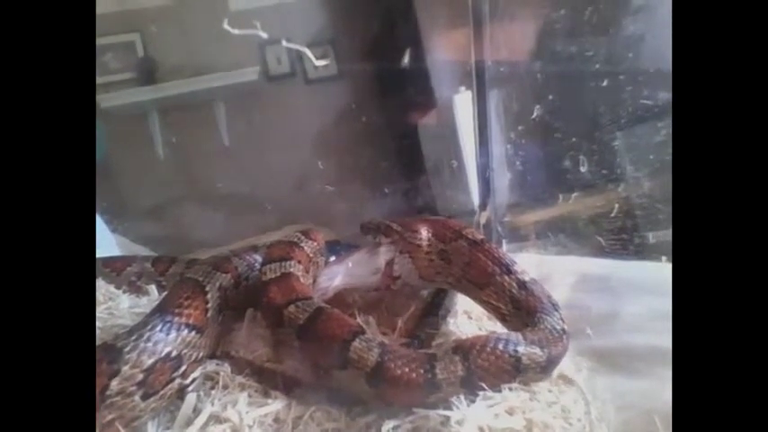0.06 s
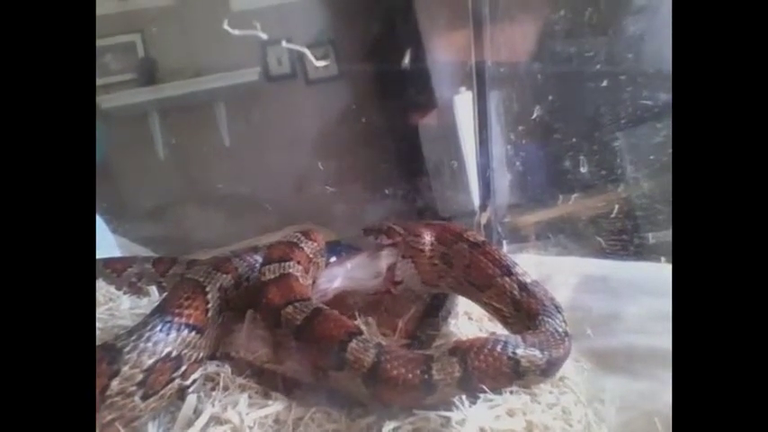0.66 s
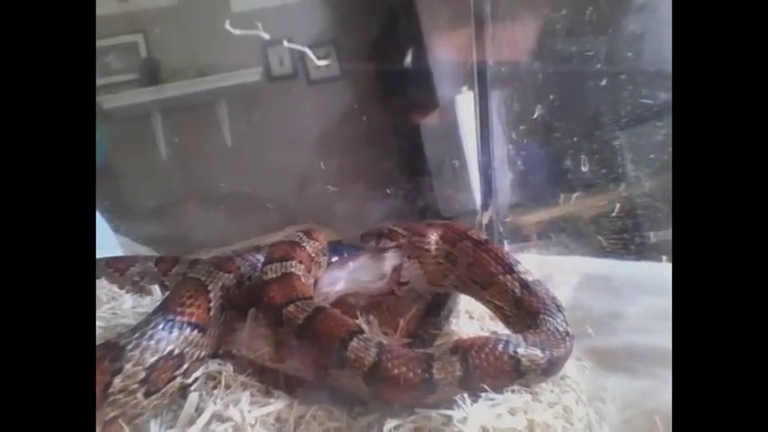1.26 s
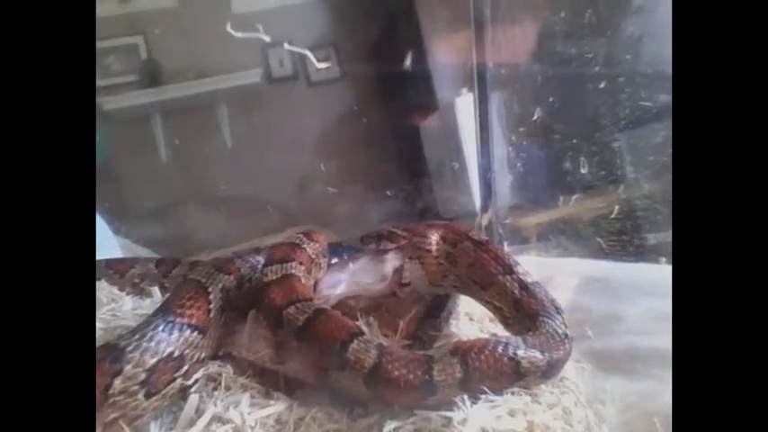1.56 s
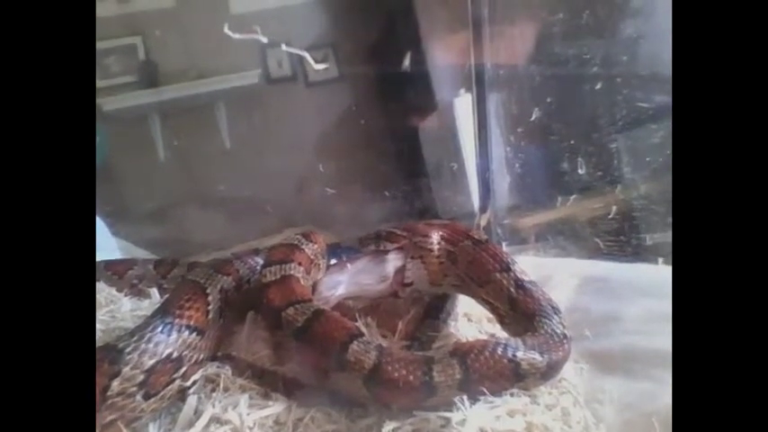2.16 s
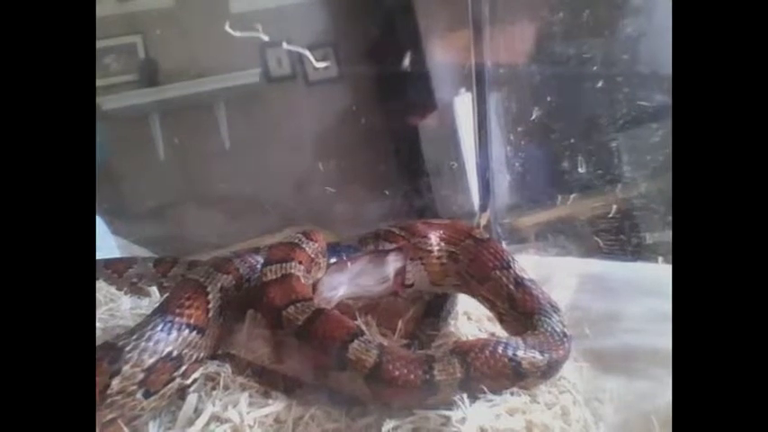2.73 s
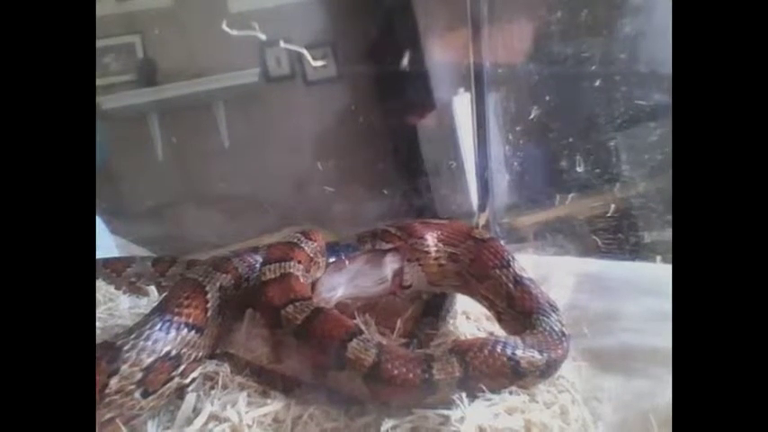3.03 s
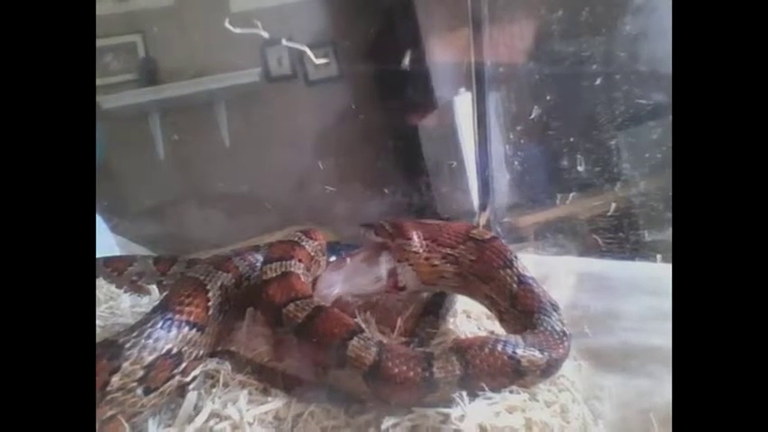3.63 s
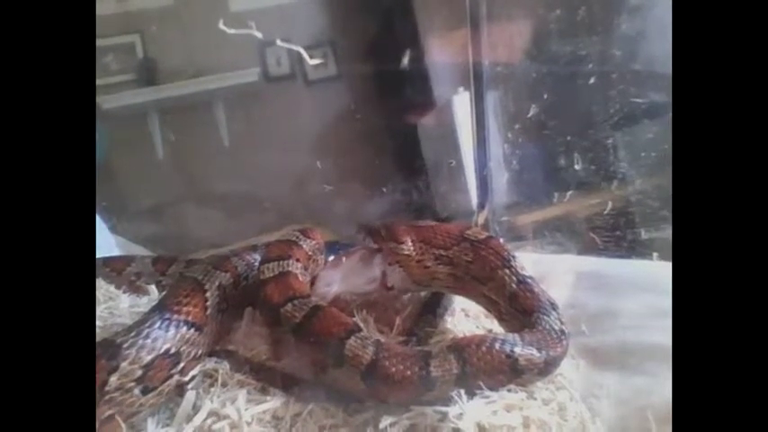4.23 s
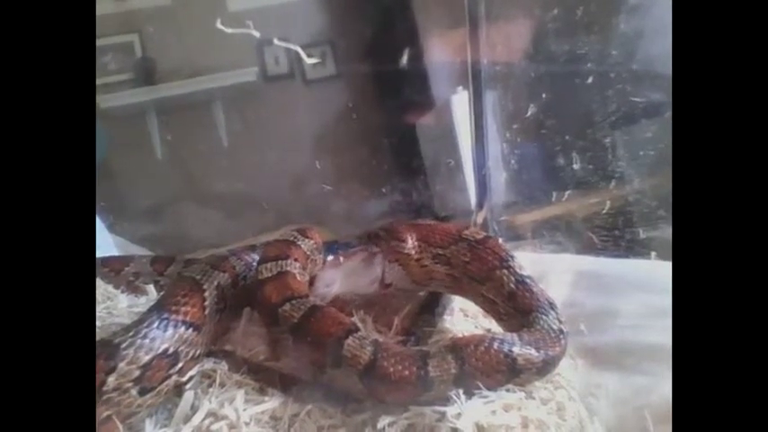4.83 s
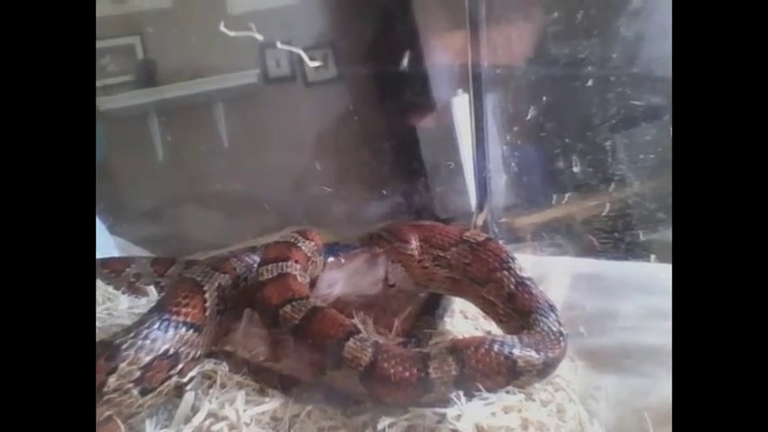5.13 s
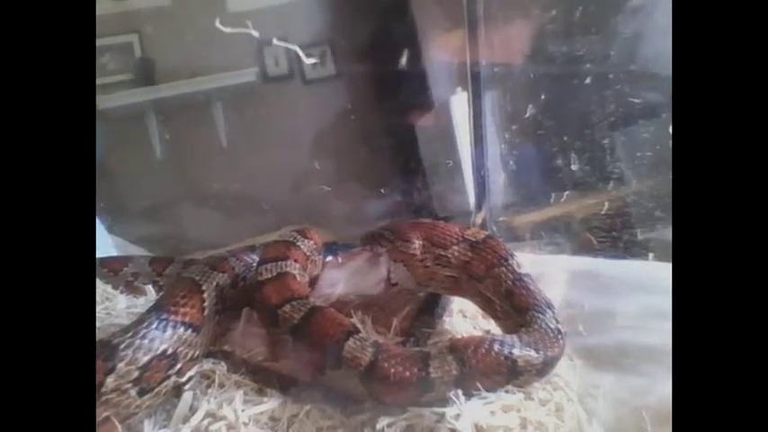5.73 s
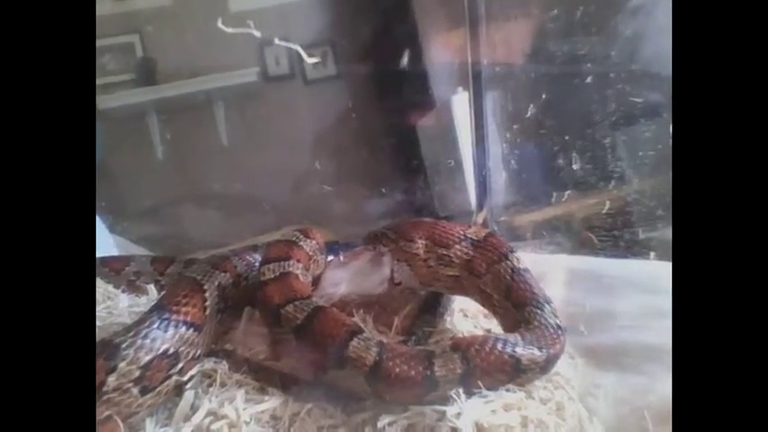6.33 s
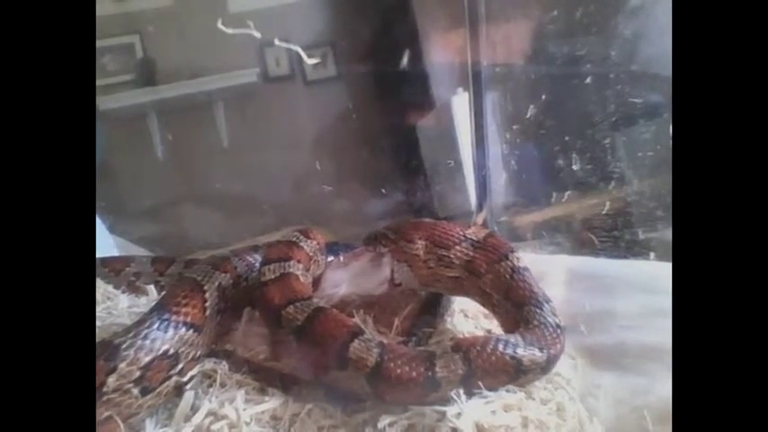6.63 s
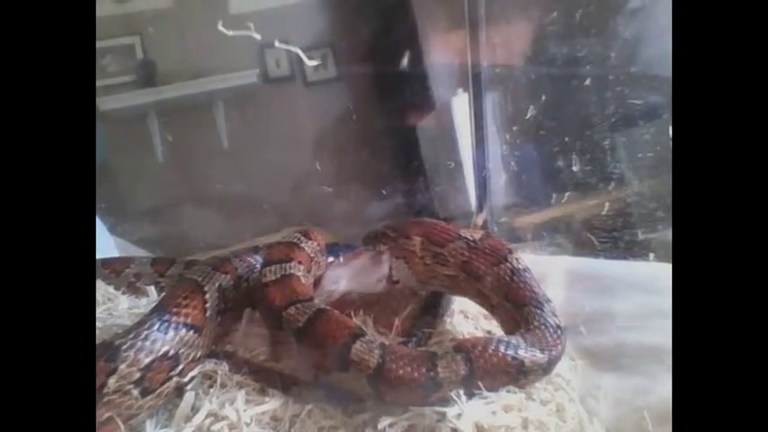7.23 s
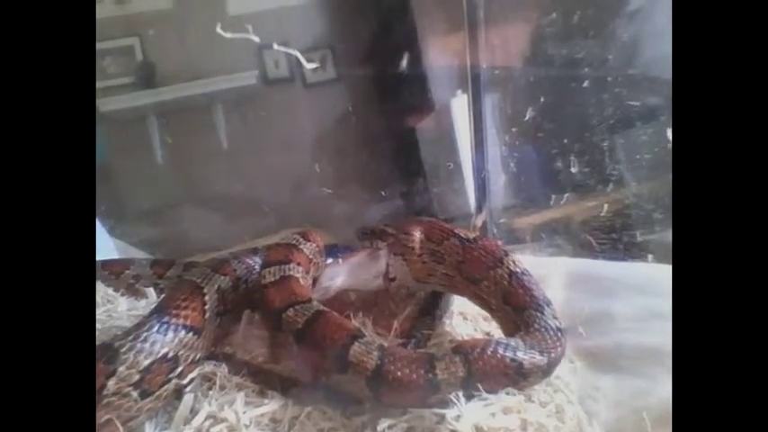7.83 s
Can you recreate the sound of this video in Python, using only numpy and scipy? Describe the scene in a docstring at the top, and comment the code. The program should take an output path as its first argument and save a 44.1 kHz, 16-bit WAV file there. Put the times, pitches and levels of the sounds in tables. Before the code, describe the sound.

A faint, muffled engine fades outside a quiet, hissing room, and a small plastic switch clicks once close by.

```python
"""Quiet room with a glass terrarium. Outside, an eight-cylinder engine eases off and fades; only
low orders and rumble pass the walls. The room booms once as the firing tone sinks through a mode.
Close by, a small plastic switch clicks down and up, a soft bump between the two ticks.
Faint handling rustles and bursts of electronic whine; steady room and microphone hiss throughout."""
import sys
import numpy as np
from scipy import signal
from scipy.fft import rfft, irfft
from scipy.io import wavfile
from scipy.ndimage import uniform_filter1d

SR = 44100
rng = np.random.default_rng(int(sys.argv[2]) if len(sys.argv) > 2 else 0)


def unload_audio(sound):
    """Save the sound as a 16-bit wav file, at the path given as the first command line argument."""
    columns = np.transpose(np.atleast_2d(sound))
    # keep every value between -1 and 1, then stretch to whole-number steps
    steps = np.round(np.clip(columns, -1, 1) * 32767)
    wavfile.write(sys.argv[1], SR, steps.astype(np.int16))


N = 356328
TIME_S = np.arange(N) / SR

# engine cycle rate, eight firings a cycle: t/s, f/Hz
CYCLE_RATE = [(0, 21.5), (0.9, 21.5), (1.3, 20.53), (1.6, 19.6), (2.05, 18.33), (2.8, 18.74), (3.15, 18.67),
              (4.1, 17.7), (4.8, 17.11), (5.7, 17.02), (6.15, 18.3), (6.8, 18.04), (7.3, 16.54),
              (8.08, 15.3)]
# engine indoors, before boom, surges and highpass: t/s, firing level/dB, burble level/dB
ENGINE_LEVELS = [(0, -65, -57), (.78, -62, -51), (.97, -52, -52.5), (1.2, -53.5, -50), (1.52, -52.5, -52.5),
                 (1.68, -59, -57), (2.05, -58, -57.5), (2.3, -57.5, -52.5), (2.92, -55.5, -49.5),
                 (3.2, -56, -59.5), (3.85, -61.5, -57), (4.08, -56.5, -60.5), (4.9, -61.5, -59),
                 (5.6, -60, -59.5), (6.05, -59, -68), (6.5, -72.5, -68), (6.9, -61.5, -70),
                 (7.3, -74, -68.5)]
# exhaust orders: multiple of the cycle rate, level/dB re burble
EXHAUST_ORDERS = [(3, -4), (4, -17), (5, 0), (7, -14), (9, -17), (11, -15)]
# firing tone surges: t/s, boost/dB
FIRING_SURGES = [(1.35, 1.5), (2.33, 8), (2.45, 4.5), (2.61, 4), (2.73, 10), (2.89, 4), (3.72, 7),
                 (5.86, 4)]
# tyre and exhaust rumble: t/s, level/dB
RUMBLE_LEVELS = [(0, -60.5), (0.7, -59), (1.6, -52.5), (2.8, -61), (4.2, -65), (5.0, -63), (6.0, -66.5),
                 (8.08, -67)]
# rumble spectrum: f/Hz, relative density/dB
RUMBLE_SPECTRUM = [(10, -8), (25, -3.5), (60, 1.5), (100, -1), (160, -4), (230, -12.5), (320, -24),
                   (600, -35.5), (1500, -74)]
# switch ticks: t/s, peak level without tail/dB, t60 factor
SWITCH_TICKS = [(4.3169, -34, 1.06), (4.3340, -38, 1.2)]
# switch modes, before bandpass: f/Hz, relative level/dB, base t60/s
PLASTIC_MODES = [(3700, -12, 0.0089), (4860, -18, 0.0059), (5250, 0, 0.01), (5770, 1, .005),
                 (6630, -6, 0.0081), (9150, -6.5, 0.0046), (10050, -11, .005), (10670, -13, 0.0084)]
# handling rustles: t/s, level/dB, 1/e half width/s
RUSTLE_SWELLS = [(3.99, -59.5, 0.049), (4.582, -63.5, 0.16), (6.661, -63.5, 0.029), (6.82, -66, 0.096)]
# rustle spectrum: f/Hz, relative density/dB
RUSTLE_SPECTRUM = [(80, -20), (180, 3), (400, 5.5), (800, -1.5), (1600, -19), (5000, -25), (12000, -47)]
# electronic whine: f/Hz, rms level/dB
WHINE_TONES = [(7000, -94), (9000, -98)]
# whine onsets: t/s
WHINE_ONSETS_S = [.52, 2.38, 4.27, 6.5, 7.98]
# room air and microphone hiss: f/Hz, relative density/dB
HISS_SPECTRUM = [(10, -13.5), (30, -1.5), (130, -1), (300, -5), (600, -9), (1200, -14), (3500, -19.5),
                 (5200, -24.5), (6400, -31), (7900, -40.5), (10500, -36.5), (12500, -39), (14000, -49),
                 (15000, -57)]

BOOM_HZ, BOOM_HALF_WIDTH_HZ, BOOM_DB = 161.6, 4.85, 15.5
SURGE_HALF_WIDTH_S = 0.031
BUMP_AT_S, BUMP_HZ, BUMP_HALF_WIDTH_S, BUMP_ENVELOPE_DB = 4.3299, 370, 0.0023, -36
WHINE_BURST_S = 0.49
HISS_DB = -61
LOWPASS_HZ = 15000


def engine():
    """Eight firings a cycle give the main tone; uneven exhaust banks add burble on other orders."""
    cycle_hz, = curves(CYCLE_RATE)
    firing_db, burble_db = curves(ENGINE_LEVELS)
    cycle_rad = 2 * np.pi * np.cumsum(cycle_hz) / SR
    firing = room_boom(8 * cycle_hz) * engine_order(8 * cycle_rad, flutter_db=2.5, sway_rad=0.22)
    burble = sum(undb(db) * engine_order(order * cycle_rad, flutter_db=2.5, sway_rad=0.25)
                 for order, db in EXHAUST_ORDERS)
    drone = undb(firing_db + surges_db()) * firing + undb(burble_db) * burble
    # the room carries little of the deepest order
    return signal.sosfilt(signal.butter(6, 63, "highpass", fs=SR, output="sos"), drone)


def engine_order(phase_rad, flutter_db, sway_rad):
    """One engine harmonic; uneven firings shake its phase and level."""
    angle_rad = phase_rad + rng.uniform(0, 2 * np.pi) + sway_rad * wander(rate_hz=14)
    return np.sqrt(2) * np.sin(angle_rad) * undb(flutter_db * wander(rate_hz=21.99))


def room_boom(hz):
    """Gain of one room mode for a tone at hz."""
    return 1 + (undb(BOOM_DB) - 1) / (1 + ((hz - BOOM_HZ) / BOOM_HALF_WIDTH_HZ) ** 2)


def surges_db():
    """Short throbs of the firing tone, all of one width."""
    return sum(db * gaussian(at_s, SURGE_HALF_WIDTH_S) for at_s, db in FIRING_SURGES)


def rumble():
    """Tyre and exhaust noise; the walls stop the treble."""
    level_db, = curves(RUMBLE_LEVELS)
    return undb(level_db) * noise(RUMBLE_SPECTRUM)


def switch():
    """Two sharp ticks; between them the casing swings once as the switch bottoms out."""
    swing = -np.sin(2 * np.pi * BUMP_HZ * (TIME_S - BUMP_AT_S))
    sound = undb(BUMP_ENVELOPE_DB) * swing * gaussian(BUMP_AT_S, BUMP_HALF_WIDTH_S)
    for at_s, db, t60_factor in SWITCH_TICKS:
        snap = undb(db) * tick(t60_factor, tail_db=-10, tail_t60_s=0.08)
        start = int(at_s * SR)
        sound[start:start + len(snap)] += snap
    return sound


def tick(t60_factor, tail_db, tail_t60_s):
    """A snap rings the plastic for milliseconds; nearby surfaces scatter a faint tail."""
    t = np.arange(SR // 8) / SR
    ring = sum(undb(db - 60 * t / (t60_s * t60_factor)) * np.cos(2 * np.pi * hz * t)
               for hz, db, t60_s in PLASTIC_MODES)
    # a small part radiates little bass; the contact softens the top
    ring = signal.sosfilt(signal.butter(5, [3300, 11200], "bandpass", fs=SR, output="sos"), ring)
    scatter = rng.standard_normal(len(t)) * undb(-60 * t / tail_t60_s)
    tail = signal.fftconvolve(ring, scatter / np.linalg.norm(scatter))[:len(t)]
    return (ring + undb(tail_db) * tail) / np.abs(ring).max()


def rustles():
    """Dull swells of rubbing, near the hiss level."""
    swells = sum(undb(db) * gaussian(at_s, half_width_s) for at_s, db, half_width_s in RUSTLE_SWELLS)
    return swells * noise(RUSTLE_SPECTRUM)


def whine():
    """Electronics sing faintly, about every two seconds."""
    gate = sum(1.0 * ((TIME_S > at_s) & (TIME_S < at_s + WHINE_BURST_S)) for at_s in WHINE_ONSETS_S)
    tones = sum(undb(db) * np.sqrt(2) * np.sin(2 * np.pi * hz * TIME_S + wander(rate_hz=160))
                for hz, db in WHINE_TONES)
    return uniform_filter1d(gate, size=1000) * tones


def hiss():
    """Steady noise of room air and microphone."""
    return undb(HISS_DB) * noise(HISS_SPECTRUM, unit_rms_above_hz=280)


def undb(db):
    """dB to gain."""
    return 10 ** (np.asarray(db) / 20)


def gaussian(at_s, half_width_s):
    """Bell envelope, peak 1."""
    return np.exp(-((TIME_S - at_s) / half_width_s) ** 2)


def curves(table):
    """Columns after t/s, linearly interpolated per sample."""
    times_s, *columns = np.transpose(table)
    return [np.interp(TIME_S, times_s, column) for column in columns]


def noise(shape, unit_rms_above_hz=0):
    """Noise shaped by a table of f/Hz, density/dB."""
    hz, db = np.transpose(shape)
    bins_hz = np.arange(N // 2 + 1) * SR / N
    gain = undb(np.interp(np.log(bins_hz + 1e-3), np.log(hz), db))
    spectrum = rfft(rng.standard_normal(N)) * gain
    return irfft(spectrum, N) / np.std(irfft(spectrum * (bins_hz >= unit_rms_above_hz), N))


def wander(rate_hz):
    """Random steps, smoothed twice; rms 1."""
    hold = int(SR / rate_hz)
    steps = np.repeat(rng.standard_normal(N // hold + 1), hold)
    smooth = uniform_filter1d(uniform_filter1d(steps, hold), hold)[:N]
    return smooth / np.sqrt(np.mean(smooth ** 2))


def scene():
    """All sources at one microphone."""
    return (engine() + rumble() + hiss() + rustles() + switch() + whine())[None]


def record(dry):
    """Steep recorder lowpass."""
    return signal.sosfilt(signal.ellip(8, 0.2, 70, LOWPASS_HZ, fs=SR, output="sos"), dry)


dry = scene()
out = record(dry)
unload_audio(out)
```